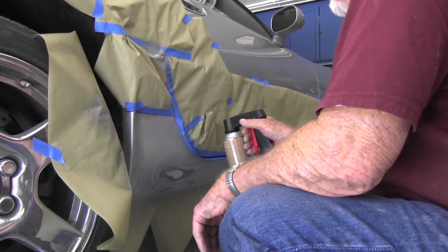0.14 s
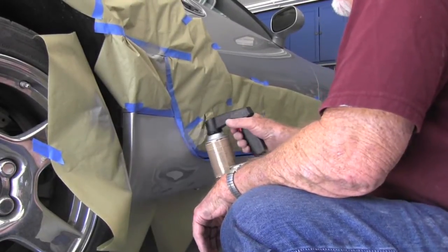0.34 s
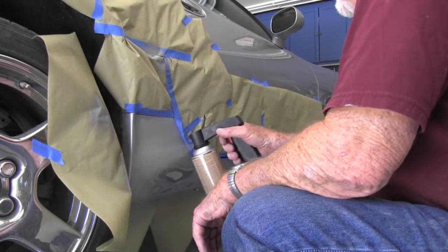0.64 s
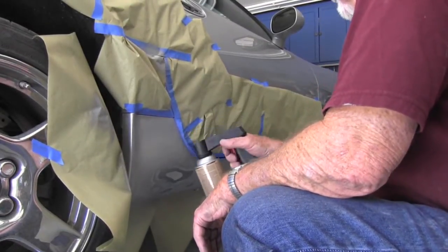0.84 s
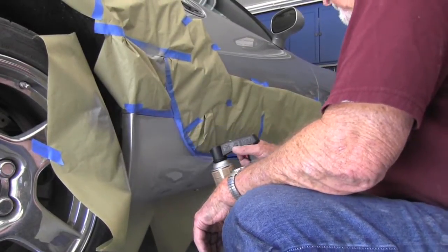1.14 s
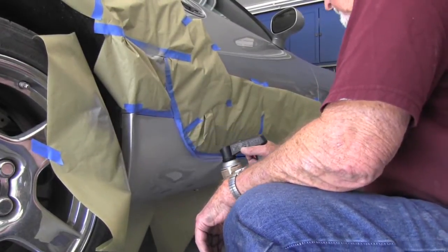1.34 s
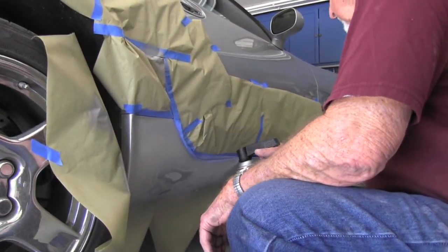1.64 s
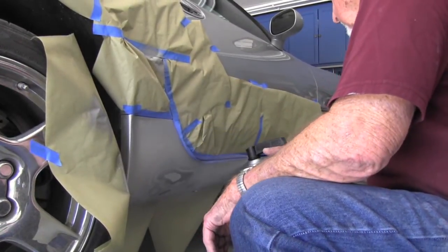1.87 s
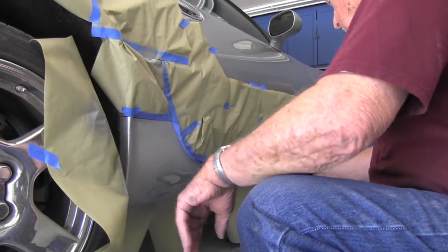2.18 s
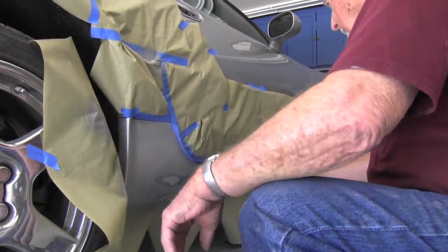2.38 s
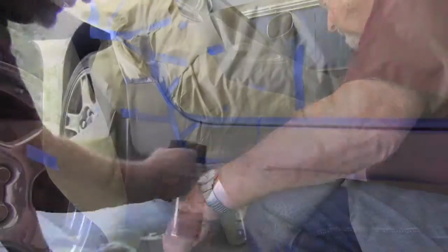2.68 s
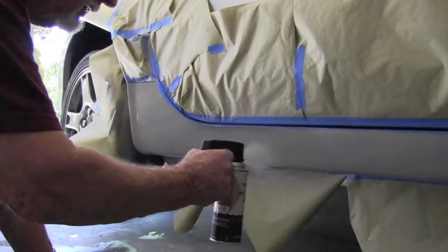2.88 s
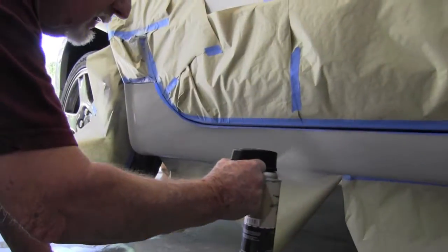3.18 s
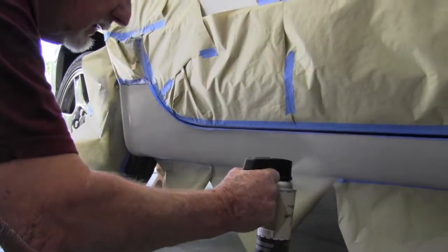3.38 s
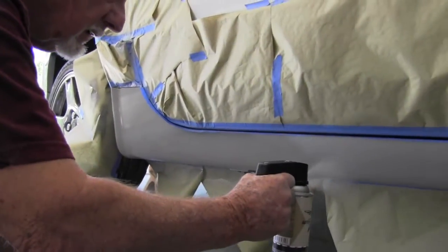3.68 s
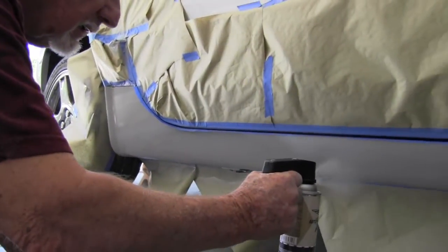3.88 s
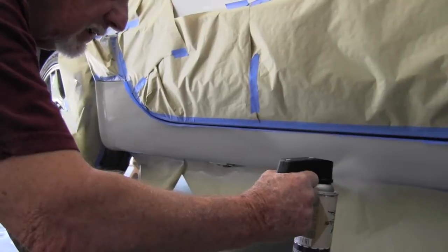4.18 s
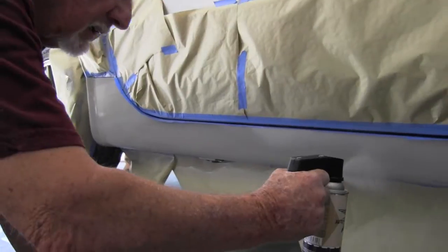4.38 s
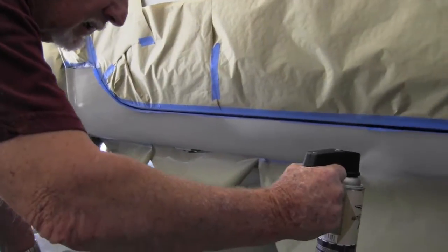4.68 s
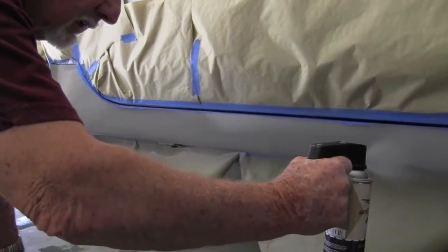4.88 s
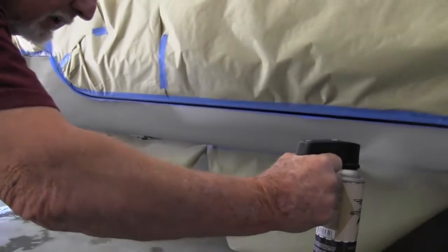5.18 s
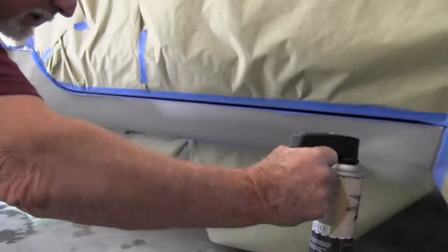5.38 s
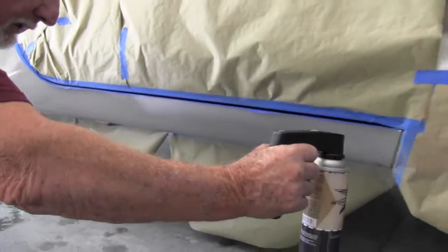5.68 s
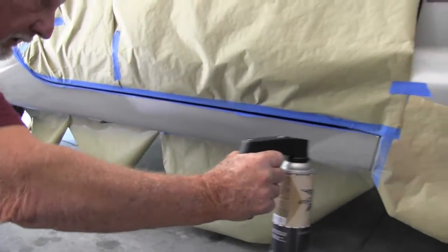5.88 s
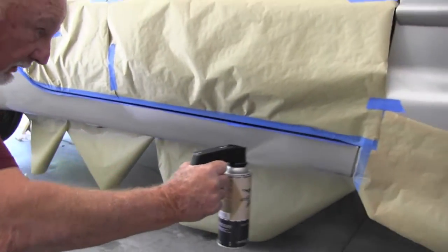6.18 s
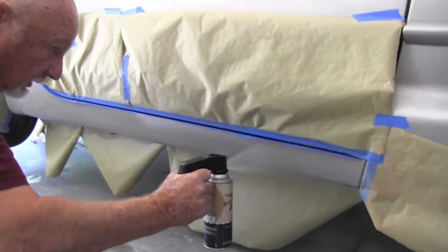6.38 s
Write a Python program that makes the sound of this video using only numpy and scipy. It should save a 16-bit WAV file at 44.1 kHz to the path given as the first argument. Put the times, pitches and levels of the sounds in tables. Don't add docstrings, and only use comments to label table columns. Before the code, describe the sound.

An aerosol can hisses in short spurts and then long steady passes against a car panel, with trigger clicks, faint bird whistles and dull knocks.

```python
import sys
import numpy as np
from scipy import signal
from scipy.io import wavfile
from scipy.ndimage import uniform_filter1d

SR = 44100
rng = np.random.default_rng(int(sys.argv[2]) if len(sys.argv) > 2 else 0)


def materialize(psi):
    bounded = np.clip(np.atleast_2d(psi).T, -1, 1)
    quanta = np.round(bounded * 32767).astype(np.int16)
    wavfile.write(sys.argv[1], SR, quanta)


def how_loud(loudness_db):
    steps = np.asarray(loudness_db, float) / 20
    return 10 ** steps


N = 287973
FRAMES, HZ = N // 256 + 5, np.fft.rfftfreq(1024, 1 / SR)[:, None]
T = np.arange(FRAMES) * 256 / SR


def evened(x):
    return x / np.sqrt(np.mean(x ** 2) + 1e-20)


def read(points, hz):
    f, value = np.transpose(points)
    return np.interp(np.log(hz + 1), np.log(f + 1), value)


def add(mix, s, sound):
    part = mix[round(s * SR):][:len(sound)]
    part += sound[:len(part)]


def patches(bins_size, frames_size):
    field = rng.standard_normal((FRAMES, 513)).T
    for _ in range(2):
        field = uniform_filter1d(uniform_filter1d(field, bins_size, 0), frames_size, 1)
    return evened(field)


# f/Hz, correlation
LIKENESS = [(60, 0.8), (200, 0.62), (500, 0.76), (2800, 0.86), (4500, 0.82), (6500, 0.58), (10000, 0.62),
            (15000, 0.99)]
# f/Hz, left minus right/dB
LEAN = [(60, -4), (180, -2), (550, -1), (1650, -1.5), (4970, -1.5), (15000, -1)]
# t/s, left minus right/dB, stereo width/factor
PLACE = [(0, 1.6, 0.61), (2.5, 1.9, 0.59), (3, -0.5, 0.45), (4, -1, 1.4), (5.7, -0.8, 1.44), (6, -1, 1),
         (6.53, 0.8, 0.23)]


def noise(magnitude):
    a, b, c, d = rng.standard_normal((FRAMES, 513, 4)).T
    s, pan_db, width = np.transpose(PLACE)
    wide = np.interp(T, s, width) ** np.clip(HZ / 2500, 0, 1)
    same = np.clip(1 - (1 - read(LIKENESS, HZ)) * wide, -1, 1)
    left = a + 1j * b
    right = same * left + np.sqrt(1 - same ** 2) * (c + 1j * d)
    white = np.std(signal.istft(left, nperseg=1024, noverlap=768)[1])
    lean = how_loud((read(LEAN, HZ) + np.interp(T, s, pan_db) + .4) / 2)
    z = np.array([left, right]) * magnitude * np.array([lean, 1 / lean])
    return signal.istft(z, nperseg=1024, noverlap=768)[1][:, :N] / white


def ring(modes, pitch_hz):
    return sum(how_loud(2 * db) / (1 + (2 * (HZ - k * pitch_hz) / w) ** 2) ** 2 for k, w, db in modes)


# f/Hz, level/dB per Hz
AIR = [(45, -30), (70, -8), (400, -3.5), (600, -7.5), (2000, -15.5), (4000, -23), (7000, -28), (16000, -43)]
# t/s, level/dB
AIR_LEVEL = [(0, -45), (1, -44.5), (2.5, -43.5), (2.8, -51.5), (4, -49.5), (5.3, -47.5), (6.53, -49.5)]
# t/s, level/dB
HUM = [(0, -78), (2.6, -69), (3, -61.5), (4.5, -60.5), (6.53, -57)]
# t/s, level/dB, f/Hz
RUSTLE = [(5.48, -64, 800), (5.53, -42, 1030), (5.6, -45, 1100), (5.72, -52, 760), (5.8, -59, 610)]


def background():
    hum_hz = 75
    s, db, hz = np.transpose(RUSTLE)
    rustle = how_loud(2 * (np.interp(T, s, db) + 23.5)) * ring([(1, 400, 0)], np.interp(T, s, hz))
    air = how_loud(2 * (read(AIR, HZ) + np.interp(T, *np.transpose(AIR_LEVEL)) + 17.0))
    t = np.arange(N) / SR
    waver = 1 + 0.0055 * evened(uniform_filter1d(rng.standard_normal(N), size=4000))
    turns = np.cumsum(hum_hz * waver) / SR
    hum = how_loud(np.interp(t, *np.transpose(HUM)) + 5.0) * np.sin(2 * np.pi * turns)
    gusts = how_loud(0.5 * patches(bins_size=3, frames_size=8))
    return noise(np.sqrt(air + rustle) * gusts) + hum


# valve open t/s, valve closing t/s
SPURTS = [
    (0.0, .14),
    (.348, 0.76),
    (1.001, 2.28),
    (2.512, 5.745),
    (5.922, 6.7),
]


def surge(t):
    surge_s = 0.057
    return sum(np.exp(-(abs(t - start) / surge_s) ** 2) for start, _ in SPURTS[1:])


# f/Hz, width/Hz, level/dB
STANDING = [(2790, 1640, -1.5), (4740, 600, -1.5), (6000, 260, 1.5), (7380, 660, 2.5), (9260, 520, -1),
            (12600, 640, -4), (14000, 700, 3)]
# start t/s, length/s, f/Hz, glide/Hz per s, level/dB
GLINTS = [(1.05, 0.35, 12300, 0, 11), (1.33, 0.67, 12000, 900, 3), (1.53, 0.74, 2650, 300, -6),
          (1.4, .5, 13500, 600, 2), (3.1, .6, 32000, -900, 4), (3.47, 0.63, 6300, -600, 4.5),
          (3.72, 0.65, 11000, -900, 9.5), (4.45, 0.56, 10700, -1000, 7.5), (4.3, .4, 13200, -300, 9),
          (4.2, .4, 14000, 299, 2.5), (4.8, .4, 11100, -1000, 9), (4.76, 0.42, 12000, -300, 6.5),
          (4.83, 0.53, 12000, 507, 7), (4, 1.6, 7400, 200, 2.5), (5.24, 0.84, 10600, 400, 5),
          (5.97, 0.32, 5800, 0, 8.5), (5.2, .6, 14400, 300, 6), (3.6, 0.49, 12400, -300, 0),
          (4.8, .7, 4020, -350, 2.5), (3.1, 1.3, 2760, -200, -6), (3.37, 1.3, 3300, -350, 5.5),
          (2.87, 1.03, 3890, -150, 6), (4.7, 1.2, 6500, 0, 1.5), (1.62, 1.0, 5860, 700, 5)]


def reflections_db(cap_hz):
    cap_rest_hz, follow = 3830, .1
    breathe = .4
    field, stretch = 0, 1 + follow * (cap_hz / cap_rest_hz - 1)
    depth = 1 + breathe * patches(bins_size=20, frames_size=60)
    for hz, width, db in STANDING:
        field = field + db * depth * np.exp(-(2 * (HZ - hz * stretch) / width) ** 2)
    for start, length, hz, glide, db in GLINTS:
        along = np.clip((T - start) / length, 0, 1)
        fade = np.sqrt(np.sin(np.pi * along).clip(0))
        width = 300 + 0.019 * hz
        centre = hz + glide * length * along
        field = field + db * fade * np.exp(-(2 * (HZ - centre) / width) ** 2)
    return field


# f/Hz, level/dB per Hz
JET = [(150, -15.5), (300, -11), (600, -7.5), (1150, -8.5), (1700, -3), (4800, -0.5), (7000, -1),
       (9700, -2.5)]
# f/Hz, level/dB per Hz
FIZZ = [(9300, -20), (10200, -2.5), (12000, 0.5), (14000, -3.5), (16000, -4)]
# factor on gap pitch, width/Hz, level/dB
GAP = [(.2, 140, -10), (.72, 190, -3), (.86, 298, -6.5), (1, 244, 0.5)]
# factor on gap pitch, width/Hz, level/dB
SURGE_RING = [(.71, 260, -0.5)]
# factor on cap pitch, width/Hz, level/dB
CAP = [(1, 340, -0.5), (1.13, 300, -12)]
# t/s, flow/dB, nearness to the panel/dB, cap facing the microphone/dB, gap f/Hz, cap f/Hz
HAND = [(0, -31.5, 0, 1.5, 2090, 3700), (.14, -32, 2.5, -2.5, 2130, 3700), (.47, -34, -2, -2.5, 2010, 3780),
        (.62, -33, -1.5, 0, 2100, 3800), (.77, -31, 0, -1, 2030, 3700), (1.05, -33, 1.5, -0.5, 2030, 3750),
        (1.6, -32, 0.6, -.3, 2130, 3810), (1.95, -33.5, -3.5, 0.6, 2170, 3930),
        (2.27, -34.5, -0.5, -2.5, 2170, 4050), (2.72, -37.5, -3.5, -2.5, 1980, 4000),
        (2.95, -35.5, -8, -1.5, 2080, 3740), (3.4, -34, -5, -1.5, 2080, 3760),
        (3.9, -34, -4, -1.5, 2070, 3810), (4.55, -34, -4, -5.5, 2070, 3930),
        (5.05, -34, -4.5, -3, 2030, 3900), (5.74, -32.5, -5, -6, 2040, 3820),
        (6.12, -33, -4, -1, 1940, 3810), (6.35, -33.5, -3, -7, 1970, 3930)]


def spray():
    open_s, close_s = 0.014, 0.026
    leak_s, leak_db = 0.031, -18
    surge_flow_db, surge_ring_db = 0.9, 8.5
    s, flow_db, *rest = np.transpose(HAND)
    near_db, cap_db, gap_hz, cap_hz = (np.interp(T, s, c) for c in rest)

    fizz_db, fizz_hz = -0.38 * near_db, 11250 + 85 * near_db
    fizz = how_loud(2 * read(FIZZ, HZ)) + ring([(0.95, 600, 0.6)], fizz_hz)
    power = how_loud(2 * read(JET, HZ)) / (1 + (HZ / 9800) ** 30)
    power = power + how_loud(2 * (1.37 * near_db + 9.5)) * ring(GAP, gap_hz)
    power = power + how_loud(2 * surge_ring_db) * surge(T) * ring(SURGE_RING, gap_hz)
    power = power + how_loud(2 * (2.53 * cap_db + 9.5)) * ring(CAP, cap_hz)
    power = power + how_loud(2 * (0.93 * fizz_db - 1.5)) * fizz

    ridges_db = reflections_db(cap_hz) + 1.08 * patches(bins_size=3, frames_size=30)
    ridges_db = ridges_db + 1.0 * patches(bins_size=14, frames_size=10)
    ridges_db = ridges_db + 1.71 * patches(bins_size=4, frames_size=3)
    abeam = np.interp(T, *np.transpose(PLACE)[::2]) - 1
    ridges_db = ridges_db + 2 * abeam * np.interp(HZ, (10600, 14100), (0, 1))

    t, valve = np.arange(N) / SR, np.zeros(N)
    for start, end in SPURTS:
        opening = np.clip(1 + (t - start) / open_s, 0, 1) ** 2.0
        closing = np.clip(1 - (t - end) / close_s, 0, 1) ** 1.14
        leak = how_loud(leak_db) * np.clip(1 + (t - start) / leak_s, 0, 1)
        valve += np.maximum(opening, leak) * closing
    sputter = uniform_filter1d(uniform_filter1d(rng.standard_normal(N), size=250), size=250)
    level_db = np.interp(t, s, flow_db) + surge_flow_db * surge(t) + 6.5 + 1.18 * evened(sputter)
    return noise(np.sqrt(power) * how_loud(ridges_db)) * valve * how_loud(level_db)


# f/Hz, t60/s
GARAGE = [(300, 0.19), (1500, 0.51), (4000, 0.37), (10000, 0.29)]


def garage(x, count=3):
    out, turn = 0, np.arange(N) / SR / 1.292
    for k in range(count):
        taps = np.zeros((2, SR // 2))
        at = np.arange(120, SR // 2 - 20, 20)
        at = at + rng.integers(0, 20, (2, len(at)))
        np.put_along_axis(taps, at, rng.choice([-1., 1.], at.shape), 1)
        taps = taps + 0.49 * taps.mean(0)
        hz, t, z = signal.stft(taps, SR, nperseg=256)
        decay = how_loud(-60 * t / read(GARAGE, hz)[:, None])
        tail = signal.istft(z * decay, SR, nperseg=256)[1]
        share = np.sqrt(2 / count) * np.cos(np.pi * (turn + k / count))
        out = out + signal.oaconvolve(x * share, tail / np.linalg.norm(tail[0]), axes=1)[:, :N]
    return out


# start t/s, length/s, level/dB, f/Hz
BIRD = [
    (0.187, 0.16, -48.5, 3080),
    (2.334, 0.24, -50.5, 3940),
    (2.4, 0.12, -48, 3400),
]


def bird():
    attack_s, fade_db = 0.022, -11
    drop, drop_s = 0.0615, 0.0306
    out = np.zeros(N)
    for start, length, db, hz in BIRD:
        t = np.arange(0, length, 1 / SR)
        flutter = 1 + 0.03 * evened(uniform_filter1d(rng.standard_normal(SR), size=150))[:len(t)]
        turns = np.cumsum(hz * (1 + drop * np.exp(-t / drop_s)) * flutter) / SR
        edges = np.minimum(np.minimum(t, length - t) / attack_s, 1)
        level = how_loud(db + fade_db * t / length + 3.0)
        add(out, start, edges * level * np.sin(2 * np.pi * turns))
    return out


# t/s, ring level/dB, low plastic ring/dB, slowness/factor on t60, snap level/dB
CLICKS = [
    (0.2755, -30, -5.5, 4.9, -34),
    (0.915, -34, -1, 5.5, -40),
    (2.442, -35.5, 1, 5.3, -40),
    (5.8646, -11.5, 8, 1, -4.5),
    (5.875, -28, 3, 3.5, -38),
    (5.880, -25, -1, 3.1, -35),
    (5.911, -30, 7, 3.5, -45),
]
# f/Hz, level/dB, t60/s
GRIP = [(800, -12.5, 0.022), (1210, -7.5, 0.008), (1710, -6.5, 0.0081), (2230, 0, 0.006),
        (2900, -3, 0.0049), (3800, -10, 0.0021), (4300, -5, 0.0036), (6000, -17, 0.0058)]


def trigger():
    snap_hz, snap_s = 3100, .00026
    rattle_s, rattle_db = .004, .9
    out, t = np.zeros(N), np.arange(3000) / SR
    spread = rng.uniform(.92, 1.08, (len(CLICKS), len(GRIP)))
    rattle = rng.standard_normal((len(CLICKS), len(t)))
    late = t - snap_s
    snap = np.cos(2 * np.pi * snap_hz * late) * np.exp(-(late / snap_s) ** 2)
    snap = snap * (1 - np.exp(-t / .00005))
    for (s, ring_db, low_db, slow, snap_db), detune, loose in zip(CLICKS, spread, rattle):
        shake = evened(uniform_filter1d(uniform_filter1d(loose, size=40), size=40))
        rough = how_loud(rattle_db * slow * np.minimum(t / rattle_s, 1) * shake)
        click = np.zeros(len(t))
        for (hz, db, t60), k in zip(GRIP, detune):
            level = how_loud(db + low_db * (hz < 2000) - 60 * t / (slow * t60))
            click += level * np.sin(2 * np.pi * hz * k * t)
        click = click * rough * (1 - np.exp(-t / 0.00051))
        add(out, s, how_loud(ring_db) * click + how_loud(snap_db) * snap)
    return out


# t/s, peak level/dB, f/Hz, t60/s
KNOCKS = [(3.735, -22.5, 245, 0.014), (3.734, -31, 960, .05), (3.734, -31, 600, 0.033),
          (3.934, -19, 397, 0.027), (3.94, -34, 120.6, 0.078), (3.945, -33.5, 368, 0.16),
          (3.99, -35.5, 441, 0.15), (5.925, -25.5, 1300, 0.08), (5.93, -27.5, 740, .06),
          (6.112, -31, 294, 0.074), (6.141, -42, 346.7, 0.67), (6.32, -31.5, 1009, 0.08),
          (6.352, -28.5, 646, .05)]


def knocks():
    out, t = np.zeros(N), np.arange(SR // 4) / SR
    shakes = uniform_filter1d(rng.standard_normal((len(KNOCKS), len(t))), size=200, axis=1)
    for (s, peak_db, hz, t60), shake in zip(KNOCKS, evened(shakes)):
        turns = np.cumsum(hz * (1 + 0.115 * shake)) / SR
        level = how_loud(peak_db - 60 * t / t60) * (1 - np.exp(-t / 0.002))
        add(out, s, level * np.sin(2 * np.pi * turns))
    return out


def scene():
    jet, hits = spray(), trigger() + knocks()
    wet = how_loud(-6.0) * jet.mean(0) + how_loud(-10.0) * hits
    return jet + hits + garage(wet[None]) + bird() + background()


def low_pass(x):
    return signal.sosfilt(signal.butter(12, 16100, fs=SR, output="sos"), x)


def record(dry):
    mic_edge_hz = 15850
    edge = signal.firwin(401, mic_edge_hz, window=("kaiser", 9), fs=SR)
    limited = signal.oaconvolve(dry, edge[None], "same")
    return low_pass(limited)


dry = scene()
out = record(dry)
materialize(out)
```